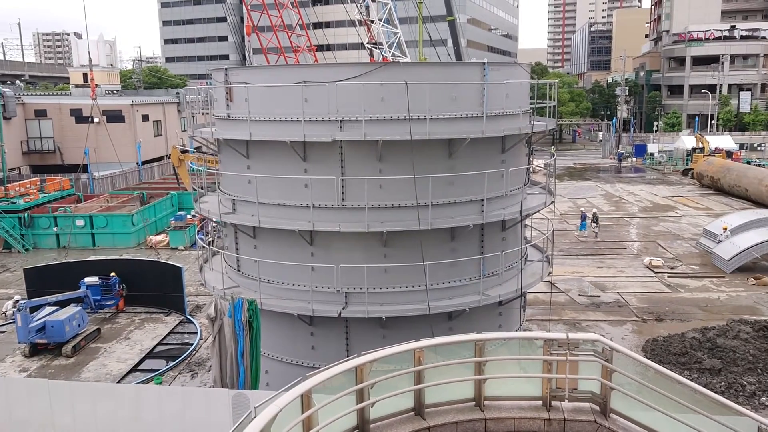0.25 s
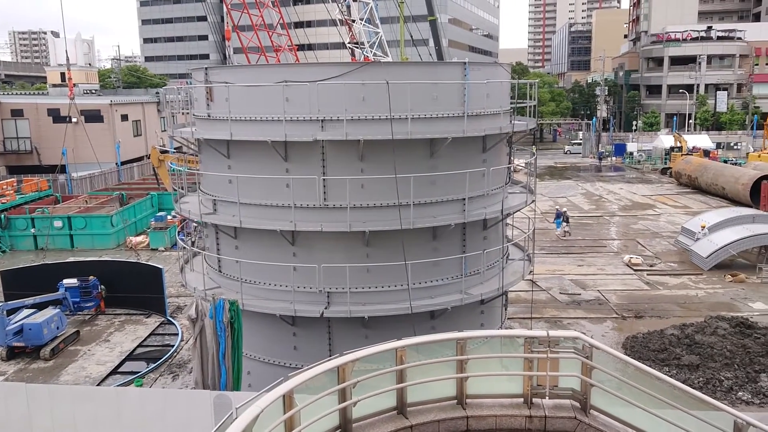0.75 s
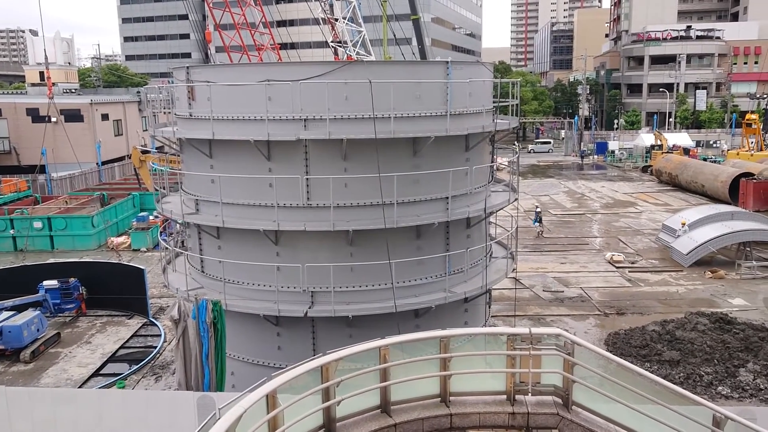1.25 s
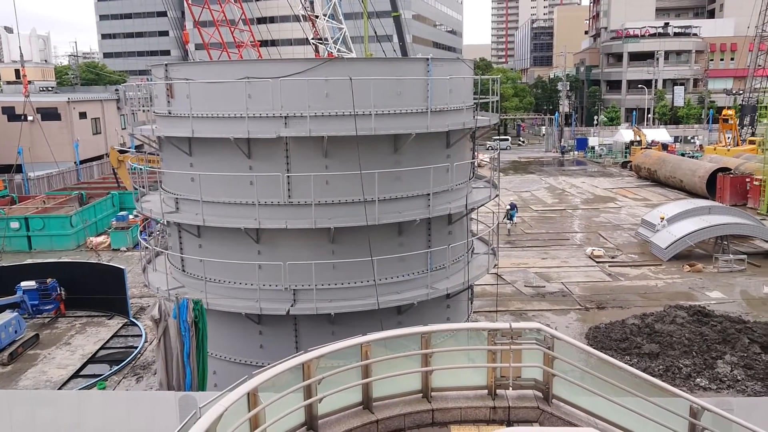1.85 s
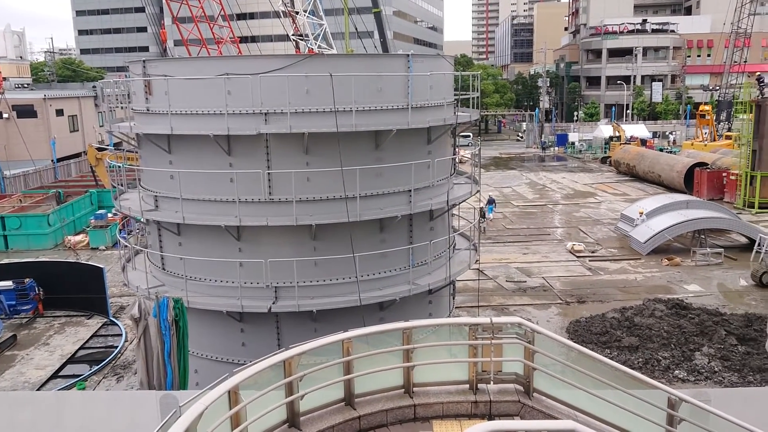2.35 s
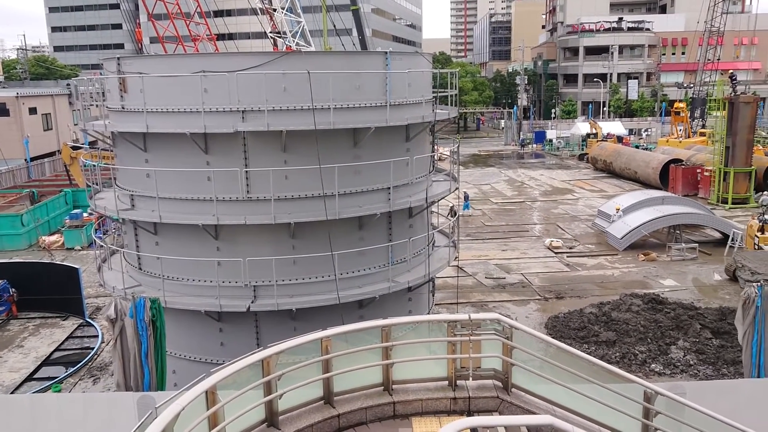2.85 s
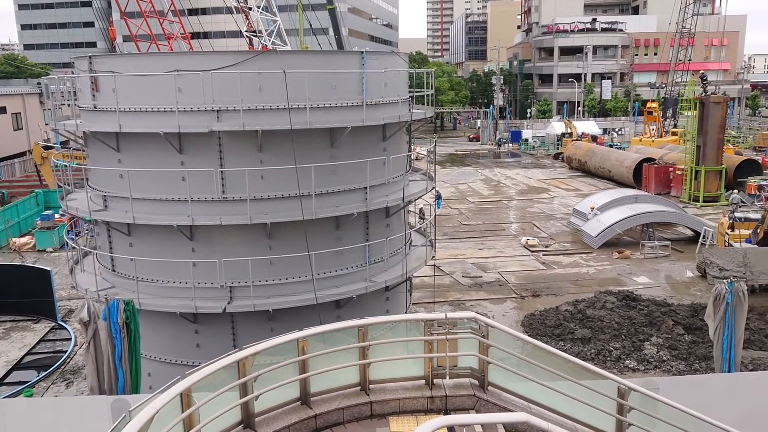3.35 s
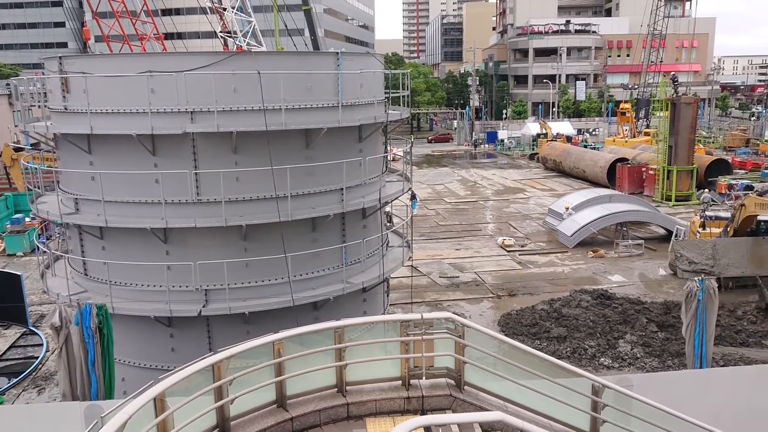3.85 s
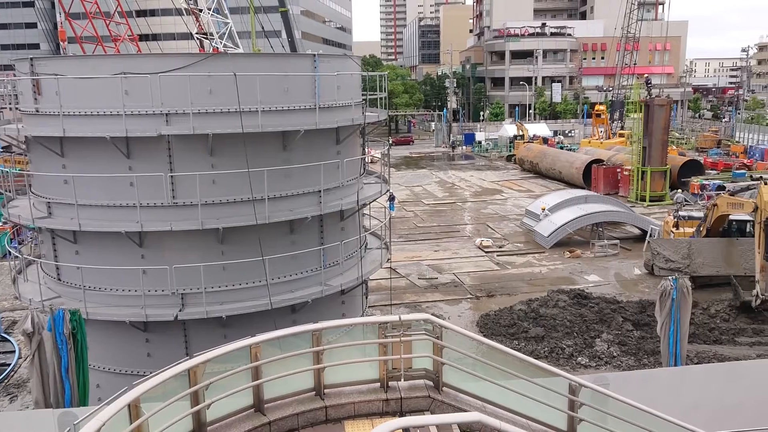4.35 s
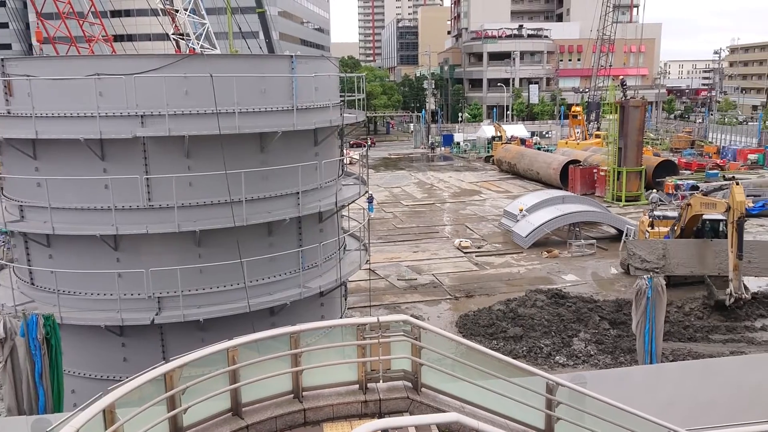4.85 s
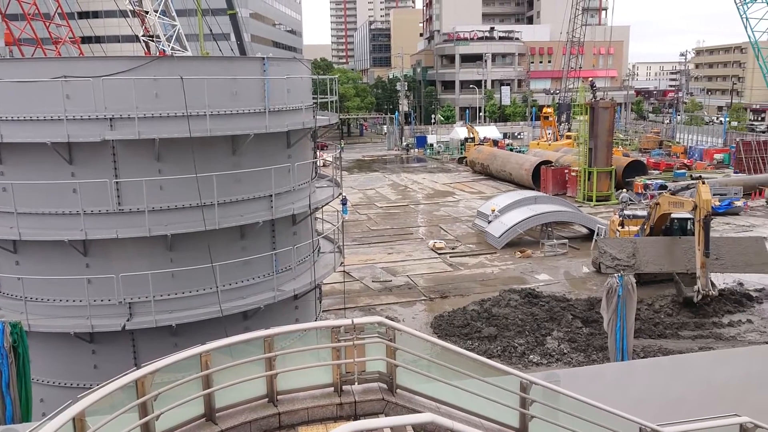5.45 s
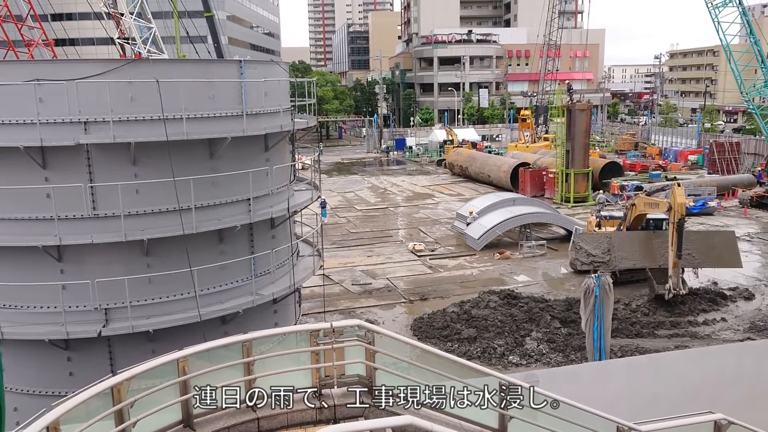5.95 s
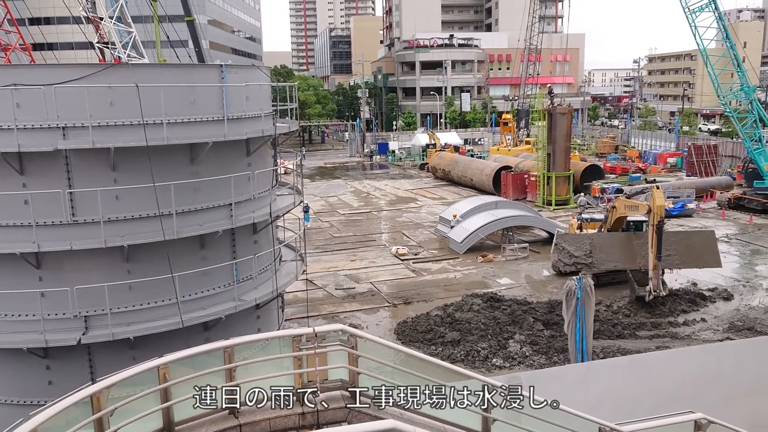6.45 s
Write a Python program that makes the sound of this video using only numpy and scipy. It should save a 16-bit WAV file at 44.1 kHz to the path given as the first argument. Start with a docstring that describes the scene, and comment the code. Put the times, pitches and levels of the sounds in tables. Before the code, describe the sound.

A wide, steady roar fills an open building site, with diesel engines and a hydraulic pump droning inside it. Steel is knocked on steel at uneven intervals, each clang ringing and echoing off nearby buildings, louder in the second half. From about four seconds an excavator's heavy bucket drags and thuds with a hollow boom. Thin squeals join near the end. Heard in stereo from a footbridge.

```python
"""A wide roar with diesels and a hydraulic pump droning in it: a building site, from a footbridge.
Steel is knocked on steel, each clang ringing on between the house fronts. A heavy steel bucket
thuds and, from about four seconds, drags, booming in its hollow; thin squeals join near the end.
Two microphones a hand apart hear each source a little early on one side."""
import sys
import numpy as np
from scipy import signal
from scipy.fft import rfft, irfft
from scipy.io import wavfile
from scipy.ndimage import uniform_filter1d

SR = 44100
rng = np.random.default_rng(int(sys.argv[2]) if len(sys.argv) > 2 else 0)


def store_wav(level_fs):
    """Save 16-bit WAV to argv[1]."""
    pcm = np.round(np.clip(np.atleast_2d(level_fs), -1, 1) * 32767)
    wavfile.write(sys.argv[1], SR, pcm.T.astype(np.int16))


N = 295690
STEP, BLOW_SAMPLES = 16, 48000  # samples per control point, samples per blow
FFT_SIZE = 10000 * (N // 10000 + 1)
TIME, CONTROL_TIME = np.arange(N) / SR, np.arange(0, N + STEP, STEP) / SR
OCTAVES_HZ = 35 * 2. ** np.arange(10)

# Where each source sits for the pair: lag of the right side in seconds, phase turn in radians, then
# rows. Each row: frequency in Hz, likeness of the sides from 0 to 1, left minus right in dB.
SITE_SEAT = -0.00027, 0, [(40, 0.8, 3), (90, 0.97, 2), (150, 0.98, 0.5), (480, 0.83, 0), (1390, 0.6, -1),
             (3500, 0, 0.5), (5400, 0, -6.5), (6950, 0.92, 1.5), (10400, 1, 0), (12500, .75, 5),
             (15500, 0.75, 4)]
BUCKET_SEAT = -0.00026, 0, [(60, 1, -0.5), (200, 0.97, -.5), (607, 0.94, -1.5), (1500, 0.46, -2.5),
               (3500, 0.27, -3.5), (7000, 0.97, 1), (14000, .4, 5)]
CLANG_SEAT = 0.000479, 1.47, [(151, 0.69, -1.5), (597, 0.92, -1), (1270, 0.73, -7.5), (2140, 0.89, -4),
              (2840, 0.13, -0.5), (4500, 0.083, -3), (6700, 0.85, -2.5), (8260, 0.69, 0), (9900, 0.74, 3.5),
              (12100, 0.17, 8), (13500, 0.26, 1), (15500, .4, 2)]

# Background bass and hiss levels; the hiss lifts around the early clangs as their echo hangs on.
# Each row: time in seconds, bass gain in dB, hiss gain in dB.
BACKGROUND_LEVELS = [(0, -3, -1.5), (1.2, 0.5, 0), (1.8, -3, 4.5), (2.4, -1, -0.5), (2.57, 1, 1),
                     (2.65, 4.5, 3.5), (2.86, 3, 1.5), (3.07, 10, -0.5), (3.13, -4, -2), (3.22, 0.5, 0),
                     (3.55, -0.5, 0), (4.0, -0.5, 1), (5.5, -4.5, -1.5), (6.7, -3, -2.5)]
# Noise spectra. Each row: frequency in Hz, relative level in dB.
ROAR_COLOUR = [(20, -45), (33, 1), (55, 0.5), (120, 0), (300, -8.5), (760, -12.5), (830, -16),
               (1300, -15.5), (2200, -16.5), (3100, -26), (4500, -19.5), (6500, -29.5), (8000, -35.5),
               (10500, -30), (12200, -29.5), (15300, -30), (16500, -46)]
SCRAPE_COLOUR = [(50, -4), (110, -14), (300, -7), (450, -8), (620, -8), (1200, -6.5), (2200, -11.5),
                 (6000, -75)]
THUD_COLOUR = [(80, -19), (250, -3), (600, 8.5), (1200, 14), (2200, 7.5), (3200, -1.5), (5000, -5),
               (9000, -32), (13000, -34), (16500, -43)]
# Engines across the site: firing rate in Hz, waver as a share of it, then rows.
# Each row: multiple of the firing rate, level in dB.
PUMP = (85.1, 0.002015, [(2, -53), (3, -55), (4, -52), (6, -50), (8, -58), (9, -55), (12, -62), (15, -64),
        (16, -63)])
DIESEL = (58.4, 0.0034, [(1, -71), (2, -50.5), (3, -56.5), (5, -52.5)])
GENERATOR = (75.4, 0.012, [(0.94, -46.5)])
# Load on the pump. Each row: time in seconds, gain in dB.
PUMP_LOAD = [(0, 0), (.3, 1.5), (1.3, 0.5), (1.6, 0.5), (2.2, -2.5), (3.2, -3.5), (4.5, -2), (6.7, -8.5)]
# Squeals. Each row: start and length in seconds, first pitch, last pitch and arch in Hz, level in dB,
# fade in dB per second, left minus right in dB.
SQUEALS = [(5.943, .035, 2400, 2410, 0, -43, 7, -1), (5.992, 0.4, 2775, 2734, 1.5, -41, 33, 2),
           (6.197, 0.23, 13620, 13750, 330, -58, 3, 5.4)]
# The bucket dragging. Each row: time in seconds, level in dB, gain of the upper scrape in dB.
DRAG = [(3.95, -55, 1), (4.1, -30.5, 0), (4.5, -32.5, -4), (4.75, -27, 0.5), (5.3, -25.5, -2.5),
        (5.9, -30, -6), (6.2, -39.5, -8), (6.4, -37.5, -3), (6.7, -31, -1.5)]
# Bucket thuds. Each row: start in seconds, level in dB, ring against it in dB, favoured pitch in Hz.
THUDS = [(2.62, -30, -5, 298), (2.83, -31, -4, 300), (2.895, -31, -6, 580), (4.654, -25, -3, 240),
         (4.698, -16, -3, 610), (4.718, -10, -7.5, 614), (4.815, -26, 0, 261), (4.855, -28, -2, 220),
         (5.014, -16.5, -4.5, 606), (5.087, -24, 0, 220), (5.171, -16.5, -10, 332),
         (5.28, -19.5, -4.5, 305), (5.31, -20.5, -7, 231), (5.398, -19.5, -7.5, 332), (5.472, -28, -1, 310),
         (5.543, -20, -3.5, 300), (5.662, -19, -11, 300), (5.827, -20, -17, 220), (6.163, -23.5, -17, 220),
         (6.469, -23, -8, 210), (6.553, -25.5, -6.5, 560), (6.629, -22.5, -5.5, 235)]

# Modes of the steel parts. Each row: frequency in Hz, relative level in dB, seconds to fall 60 dB.
BUCKET_MODES = [(140.6, -5, 0.45), (166.2, -7, 0.72), (213.3, -2, 0.44), (224, -3, 0.49), (256.7, -11, .45),
                (304.7, -1.5, 0.46), (347, -6, 0.33), (369.2, -4, 0.42), (531.7, -5, 0.2),
                (588, -1.5, 0.29), (607, -8, 0.3), (690, -19, .35)]
BEAM = [(584, -15, 1.5), (693, -14, 1.1), (1057, -13.5, 1.1), (1078, -7.5, 1.03), (1406, -15, 0.72),
        (1502, -17, 0.85), (1910, -15, 0.67), (1992, -12, 0.94), (2050, -6.5, 0.55), (4300, -4.5, 0.34),
        (4500, -12, 0.28), (6270, -15, .5), (10700, -14, .3), (11500, -6, 0.27), (13600, -15, 0.23)]
BEAM_LOW_PAIR = [(1846, -11.5, 1.2), (1893, -9.5, 1.15)]  # rings only when the beam is struck mid-span
PLATE = [(1220, -29, 0.87), (2214, -10.5, 0.24), (4070, -10, .4), (4400, -16, 0.36), (4820, -13, 0.47),
         (5600, -7, 0.84), (6940, -21, .4), (13200, -3, .25)]
RIM = [(990, -16, 0.62), (1100, -17, 0.65), (1100, -14, 0.7), (1200, -15, .4), (2230, -11, 0.49),
       (6560, -6, .3)]
FAR = [(569.4, -18.5, 0.96), (682, -26.5, 0.62), (1030, -16, 0.78), (1084, -9, 0.4), (1440, -10.5, 0.44),
       (2240, -11, .35), (4240, -10, 0.43), (6230, -8, 0.45), (6460, -8, 0.5)]
# The parts struck. Each entry: modes, echo in dB, share of the blow's decay time.
PARTS = {"mid-span": (BEAM + BEAM_LOW_PAIR, -9, 0.83), "beam": (BEAM, -8, 0.75), "plate": (PLATE, -9, 0.67),
         "far": (FAR, -7.5, 0.49), "rim": (RIM, -13, 0.92), "light": ([], -12.5, 0.25)}
# Decay of a blow and of its echo off the houses. Each row: frequency in Hz, seconds to fall 60 dB.
BLOW_T60 = [(200, 0.71), (800, 1), (2000, 0.39), (5500, 0.58), (14000, 0.12)]
ECHO_T60 = [(200, 0.6), (800, 3.3), (2000, 1.5), (5500, 1.87), (14000, 0.19)]
# Build-up of a clang. Each row: frequency in Hz, time constant in seconds.
CLANG_RISE = [(200, 0.0023), (1100, 0.00043), (5000, 0.0018), (12000, 0.00042)]
# Frequencies in Hz at which a clang's colour is set.
COLOUR_HZ = [60, 300, 550, 800, 1100, 1500, 2000, 3000, 4400, 6400, 7800, 10000, 12000, 14000, 16500]
# Steel on steel. Each row: start in seconds, level in dB, ring against it in dB, part struck,
# colour in dB at all but the first and last of COLOUR_HZ.
CLANGS = [
  (0.419, -31, 0, "light", (-9, -11, -10, -9, -9, -9, 7, -4, -14, -18, -14, 4, -6)),
  (1.4377, -12.5, -8, "far", (-0.5, 4.5, -1, 3, -1, -12, -13, -12.5, -11, -17, -12, -4, -11)),
  (1.7366, -11.5, -9, "far", (0.5, 2, 2, 2.5, 0, -11, -9, -10.5, -8.5, -21, -6, -9.5, -7)),
  (1.9984, -16.5, -8, "rim", (-25, -10, -3, 4.5, -9, -7, -21, -16, -15, -24, -15, -30, -30)),
  (2.7243, -14.5, -10, "far", (-2, 6, 0, -1, -4, -4, -17, -9.5, -23, -43, -28, -28, -34)),
  (3.676, -4.5, -8.5, "mid-span", (-10, -6, -6.5, -3.5, 1, -6, -15, -11, -17.5, -26, -17.5, -11, -13)),
  (4.077, -7, -11.5, "beam", (-14, -6, -5.5, -1.5, 3, -1.5, -17, -12, -19, -20, -8, -28, -12)),
  (4.43, -2.5, -13, "beam", (-17, -3.5, -4.5, 0, -4, -1, -15.5, -14, -17, -23, -13.5, -8.5, -13)),
  (4.763, -7, -10.5, "plate", (-4, 2, -5, -2, 2, 1, -16, -1.5, -16, -16, -7, -21, -3)),
  (5.063, -4, -10, "plate", (-18, 0.5, -4, -3, -0.5, -1, -12.5, -8, -12, -20.5, -12, -18, -4.5)),
  (5.977, -15.5, 5, "light", (-12, -1, 0, -7, -5, -1, -19, -12, -21, -28, -29, -21, -27)),
  (6.0046, -13, 0, "light", (2.5, -7, 1, -2, -1, 3, -8, -12, -20, -26, -30, -25, -29))]


def undb(db):
    return 10 ** (np.asarray(db) / 20)


def bin_hz(size):
    return np.maximum(np.arange(size // 2 + 1) * SR / size, 1.)


def over_hz(table, hz):
    """Read rows of frequency and value on a log axis."""
    return np.interp(np.log(hz), np.log(np.array(table)[:, 0]), np.array(table)[:, 1])


def over_time(rows):
    """Columns of a curve table at the control points."""
    times, *columns = np.transpose(rows)
    return [np.interp(CONTROL_TIME, times, column) for column in columns]


def per_sample(control):
    return np.interp(TIME, CONTROL_TIME, control)


def walk(rate):
    """Random levels held 1 / rate seconds and smoothed twice; spread near 1."""
    hold, n = int(SR / STEP / rate), len(CONTROL_TIME)
    steps = np.repeat(rng.standard_normal(n // hold + 1), hold)
    return 1.307 * uniform_filter1d(uniform_filter1d(steps, hold), hold)[:n]


def mic_pair(spectrum, other, seat, full_turn_hz=500, centred_hz=6390):
    """The right microphone hears the left's sound shifted, plus another; the camera body tilts both."""
    lag_s, turn_rad, rows = seat
    rows, hz = np.array(rows), bin_hz(2 * len(spectrum) - 2)
    alike = np.clip(over_hz(rows[:, :2], hz), 0, 1)
    turn = (turn_rad * np.clip(hz / full_turn_hz, 0, 1) - 2 * np.pi * hz * lag_s) * (hz < centred_hz)
    right = alike * spectrum * np.exp(1j * turn) + np.sqrt(1 - alike ** 2) * other
    tilt = undb(over_hz(rows[:, ::2], hz) / 2)
    return np.array([spectrum * tilt, right / tilt])


def seated(tones, seat):
    """Tones on both microphones, widened by a quarter-cycle-shifted copy mixed into the right side."""
    spectrum = rfft(tones, FFT_SIZE)
    return irfft(mic_pair(spectrum, 1j * spectrum, seat), FFT_SIZE)[:, :N]


def noise_bands(gain, seat, centres):
    """Coloured noise on both microphones, rms near 1, split into overlapping octave bands."""
    size = 2 * len(gain) - 2
    noise, unrelated = gain * rfft(rng.standard_normal((2, size)))
    both = mic_pair(noise, unrelated, seat) / np.sqrt(np.mean(gain ** 2))
    octave = np.clip(np.log2(bin_hz(size) / centres[0]), 0, len(centres) - 1)
    for k, hz in enumerate(centres):
        share = np.clip(1 - abs(octave - k), 0, 1)
        yield hz, irfft(both * share, size)[:, :N]


def roar(level_db=-35, pan_db=-1):
    """Many machines far off: the bands swell together and flicker alone."""
    bass_db, hiss_db = over_time(BACKGROUND_LEVELS)
    out, swell_db = 0, .4 * walk(3)
    gain = undb(over_hz(ROAR_COLOUR, bin_hz(FFT_SIZE)))
    for hz, noise in noise_bands(gain, SITE_SEAT, OCTAVES_HZ):
        bass = np.clip(np.log2(400 / hz) / 2, 0, 1) * (hz > 50)
        hiss = np.clip(np.log2(hz / 500) / 2, 0, 1)
        flicker_db = (1.2 if hz < 3000 else -1.83) * walk(9)
        out += noise * per_sample(undb(bass * bass_db + hiss * hiss_db + swell_db + flicker_db))
    return out * undb(level_db + np.array([[1], [-1]]) * pan_db / 2)


def engine(firing_hz, waver, orders, load_db=0):
    """Orders of one shaft; the speed wavers and each order flutters on its way over the site."""
    phase = 2 * np.pi * np.cumsum(per_sample(firing_hz * (1 + waver * walk(2.002)))) / SR
    out = 0
    for order, db in orders:
        rms = per_sample(undb(db + load_db + 3.5 * walk(16)))
        out += rms * np.sqrt(2) * np.sin(order * phase + 2 * np.pi * rng.random())
    return seated(out, SITE_SEAT)


def squeal(start, length, start_hz, end_hz, arch_hz, db, fade_db_per_s, pan_db):
    """A thin wavering tone, as from a dry brake or pulley: it glides, arches and fades."""
    progress = np.clip((CONTROL_TIME - start) / length, 0, 1)
    gate = np.clip(np.minimum(progress, 1 - progress) * length / 0.012, 0, 1)
    level_db = db - fade_db_per_s * progress * length
    sides = [per_sample(gate * undb(level_db + side * pan_db / 2 + 3.3 * walk(40))) for side in (1, -1)]
    hz = start_hz + (end_hz - start_hz) * progress + arch_hz * np.sin(np.pi * progress)
    return sides * np.sin(2 * np.pi * np.cumsum(per_sample(hz)) / SR)


def bucket_drag():
    """Dragged steel: the hollow bucket booms in its modes, and judder shakes every band."""
    bins = bin_hz(FFT_SIZE)
    boom = sum(undb(2 * db) / (1 + (bins - hz) ** 2 * (t60 / 2.3) ** 2) for hz, db, t60 in BUCKET_MODES)
    scrape = undb(over_hz(SCRAPE_COLOUR, bins) - 8)
    gain = np.sqrt(boom / boom.max() + scrape ** 2)
    db, scrape_db = over_time(DRAG)
    level = (CONTROL_TIME > DRAG[0][0]) * undb(db)
    judder_db = 1.2 * walk(25)
    return sum(noise * per_sample(level * undb((hz > 450) * scrape_db + judder_db + walk(23)))
               for hz, noise in noise_bands(gain, BUCKET_SEAT, OCTAVES_HZ[:7]))


def ring(start, level_db, modes, smear, scatter_db=2, steady=0.72, rise_s=0.0019):
    """The strongest modes of one steel part; close neighbours and echoes make each one flutter."""
    out, at = np.zeros(N + SR), int(start * SR)
    for hz, db, t60 in modes:
        t = np.arange(int(np.clip(t60 * 0.82, .05, 1) * SR)) / SR
        knots = np.arange(100) / (min(smear * hz, 160) + 5)
        scatter, real, imag = rng.standard_normal((3, len(knots)))
        real[0], imag[0] = 1, 0  # every mode speaks at the blow
        flutter = np.interp(t, knots, steady + 0.69 * (real + 1j * imag))
        envelope = undb(level_db + db + scatter_db * scatter[0] - 60 * t / t60) * (1 - np.exp(-t / rise_s))
        tone = np.exp(2j * (np.pi * hz * t + imag[-1]))
        out[at:at + len(t)] += (envelope * flutter * tone).imag
    return out[:N]


def blow(start, level_db, colour, echo_db, t60_share, rise, seat, centres, crest_db=13, hold_s=0.011):
    """Crowded plate modes as noise: each band jumps, holds, decays fast, then hangs on as echo."""
    out, at = np.zeros((2, N + BLOW_SAMPLES)), int(start * SR)
    bins, t = bin_hz(BLOW_SAMPLES), CONTROL_TIME[:BLOW_SAMPLES // STEP]
    # Clusters of modes make each blow uneven in the treble.
    ripple_db = 2.2 * np.interp(bins / 300, np.arange(400), rng.standard_normal(400))
    gain = undb(over_hz(colour, bins) + ripple_db * np.clip(bins / 4000, 0, 1))
    since_hold, fade_out = np.maximum(t - hold_s, 0), np.sqrt(1 - t / t[-1])
    for hz, noise in noise_bands(gain, seat, centres):
        direct = undb(-60 * since_hold / (t60_share * over_hz(BLOW_T60, hz)))
        echo = undb(echo_db - 60 * t / over_hz(ECHO_T60, hz))
        pole = np.exp(-STEP / (SR * over_hz(rise, hz)))  # rounds the attack
        power = signal.lfilter([(1 - pole) ** 2], [1, -2 * pole, pole ** 2], direct ** 2 + echo ** 2)
        rattle_db = 1.27 * walk(60)[:len(t)]  # loose parts chatter
        envelope = np.sqrt(power) * undb(level_db - crest_db + rattle_db) * fade_out
        out[:, at:at + BLOW_SAMPLES] += noise * np.interp(TIME[:BLOW_SAMPLES], t, envelope)
    return out[:, :N]


def bucket_thuds(fall_db_per_octave=12):
    """Dull knocks on the bucket, each waking most the modes near one pitch."""
    blows = rings = 0
    for start, db, ring_db, favoured_hz in THUDS:
        blows += blow(start, db, THUD_COLOUR, echo_db=-12.5, t60_share=0.52, rise=[(1000, 0.00024)],
                      seat=BUCKET_SEAT, centres=OCTAVES_HZ[2:7])
        modes = [(hz, mode_db - fall_db_per_octave * abs(np.log2(hz / favoured_hz)), t60)
                 for hz, mode_db, t60 in BUCKET_MODES]
        rings += ring(start, db + ring_db, modes, smear=0.071)
    return blows + seated(rings, BUCKET_SEAT)


def clangs():
    """Steel knocked on steel between the house fronts; each blow's colour weights the part's modes."""
    blows = rings = 0
    for start, db, ring_db, part, tone_db in CLANGS:
        modes, echo_db, t60_share = PARTS[part]
        colour = list(zip(COLOUR_HZ, [tone_db[0] - 2.5, *tone_db, tone_db[-1] - 13.5]))
        blows += blow(start, db, colour, echo_db, t60_share, CLANG_RISE, CLANG_SEAT, OCTAVES_HZ[2:])
        struck = [(hz, mode_db + over_hz(colour, hz), t60) for hz, mode_db, t60 in modes]
        rings += ring(start, db + ring_db, struck, smear=0.04)
    return blows + seated(rings, CLANG_SEAT)


def scene():
    """The site as it reaches the pair on the footbridge."""
    steel = clangs() + bucket_thuds()
    engines = engine(*PUMP, load_db=over_time(PUMP_LOAD)[0]) + engine(*DIESEL) + engine(*GENERATOR)
    return roar() + engines + bucket_drag() + sum(squeal(*row) for row in SQUEALS) + steel


def record(dry):
    """Microphone ports swallow a treble band; a soft limiter rounds peaks; deep bass and top are cut."""
    port_hz, port_width_hz = 8970, 1450
    headroom, low_cut_hz, top_hz = 0.9, 45, 16000
    wet = dry - signal.lfilter(*signal.iirpeak(port_hz, port_hz / port_width_hz, SR), dry)
    wet = headroom * np.tanh(wet / headroom)
    wet = signal.sosfilt(signal.butter(4, low_cut_hz, "high", fs=SR, output="sos"), wet)
    return signal.sosfilt(signal.ellip(10, .2, 70, top_hz, fs=SR, output="sos"), wet)


dry = scene()
out = record(dry)
store_wav(out)
```